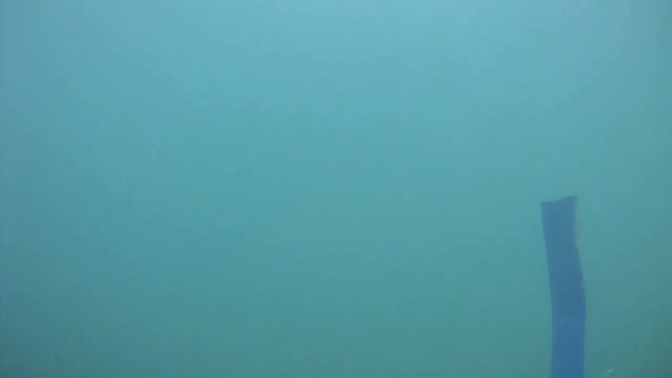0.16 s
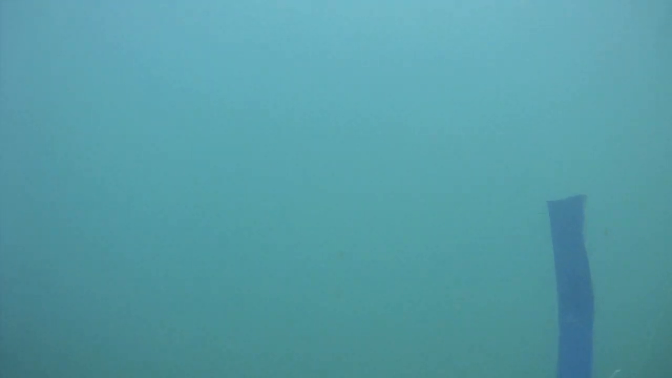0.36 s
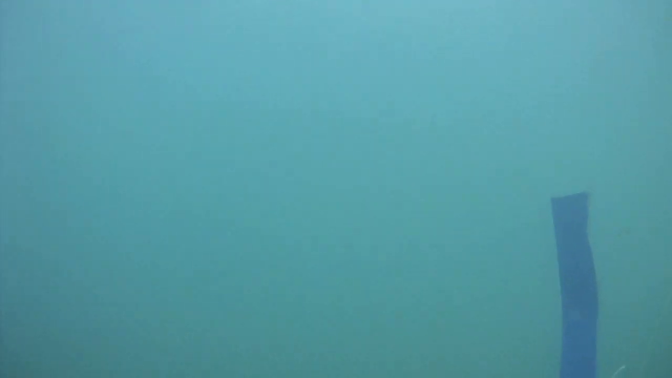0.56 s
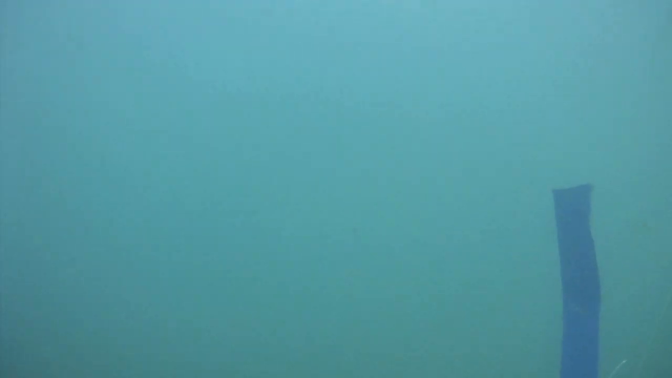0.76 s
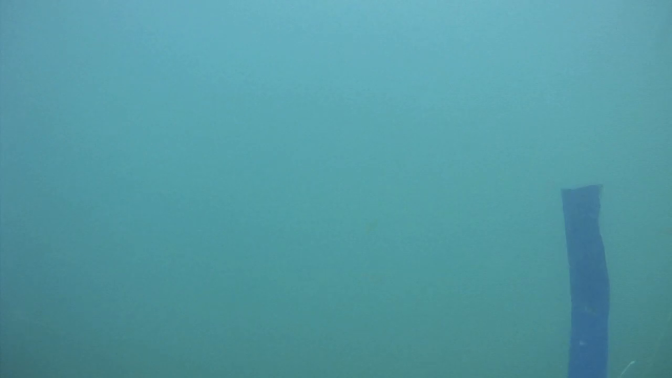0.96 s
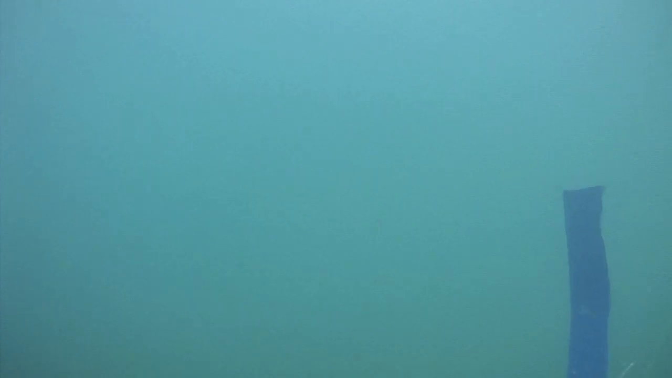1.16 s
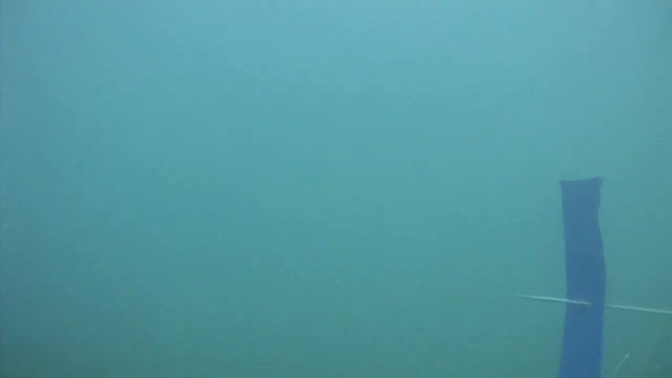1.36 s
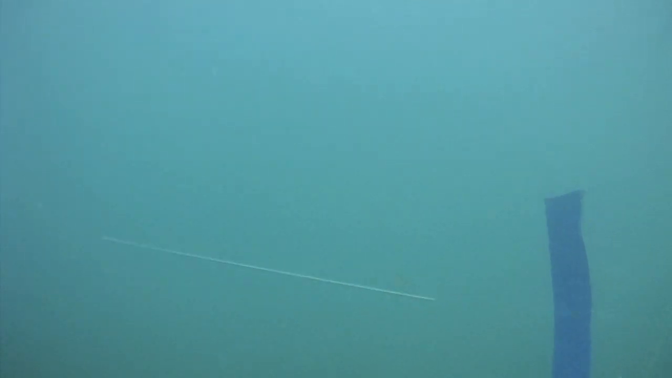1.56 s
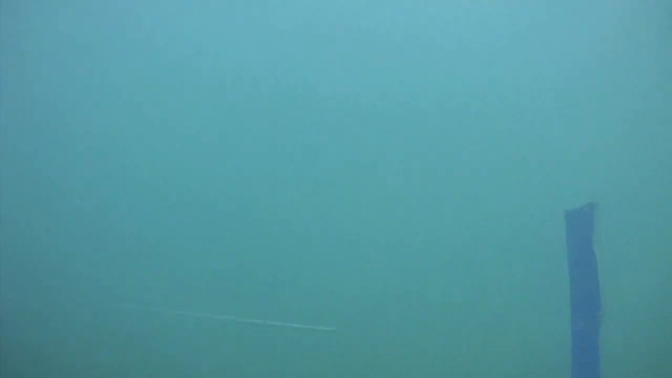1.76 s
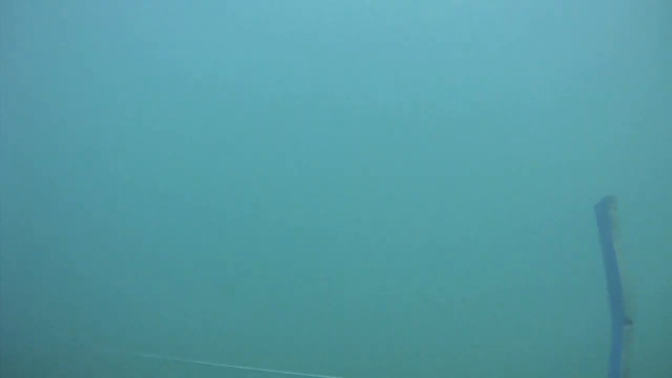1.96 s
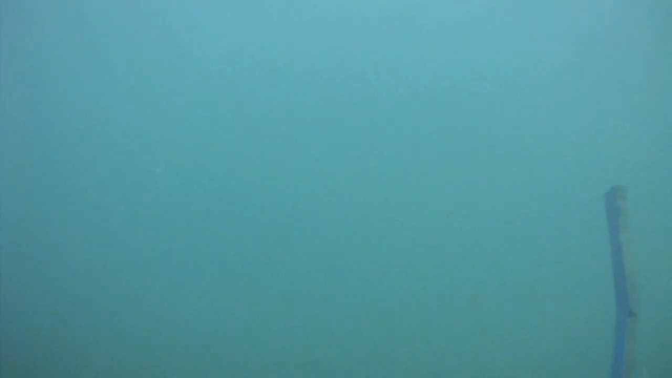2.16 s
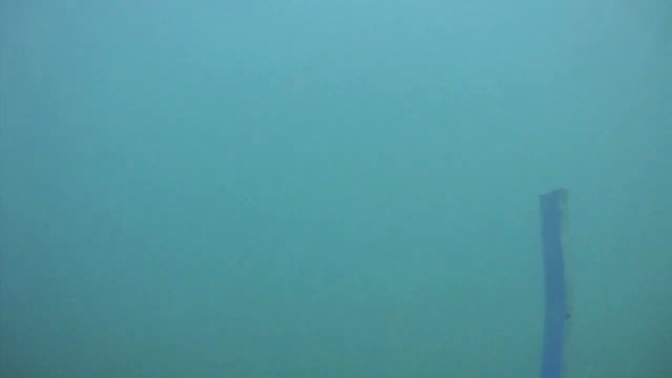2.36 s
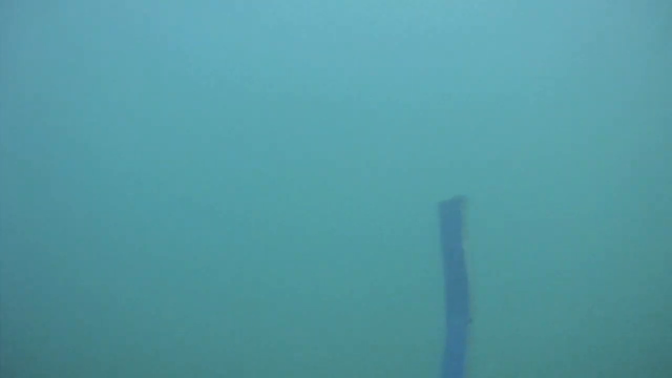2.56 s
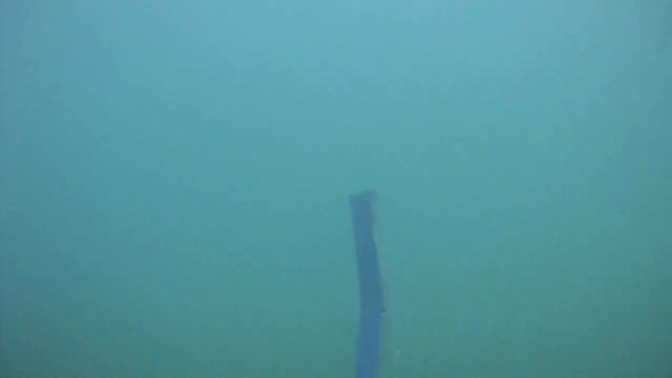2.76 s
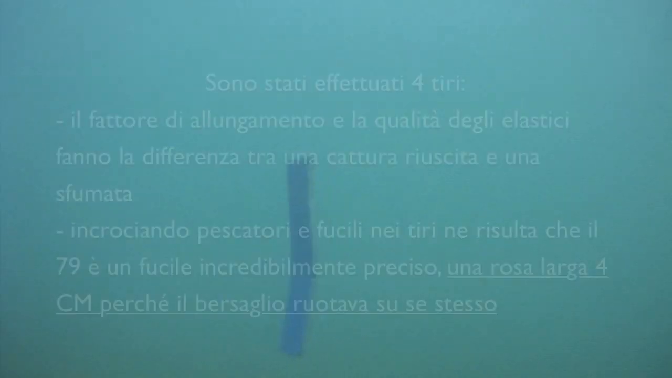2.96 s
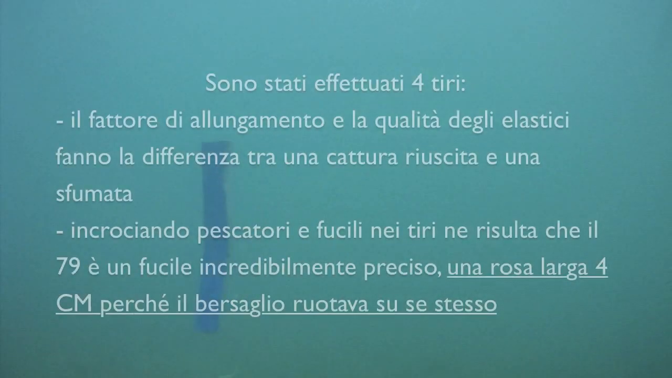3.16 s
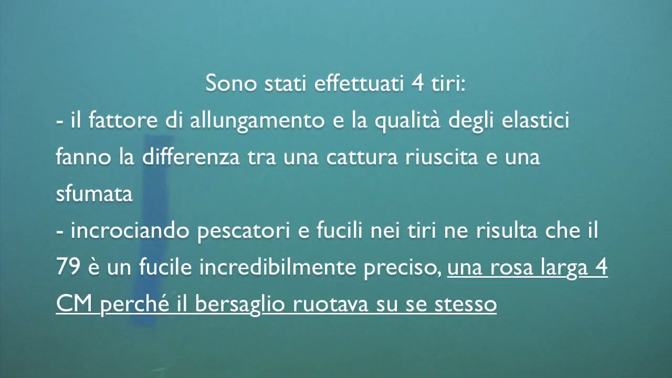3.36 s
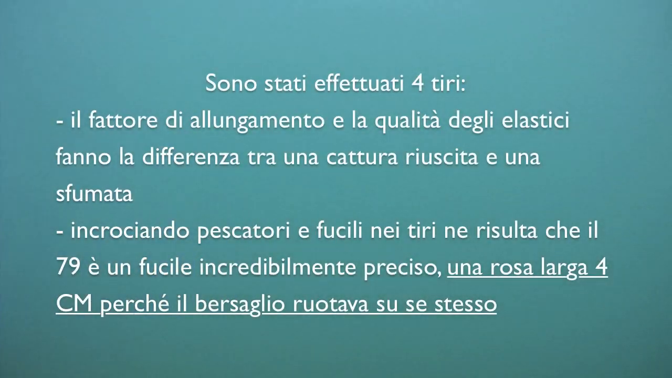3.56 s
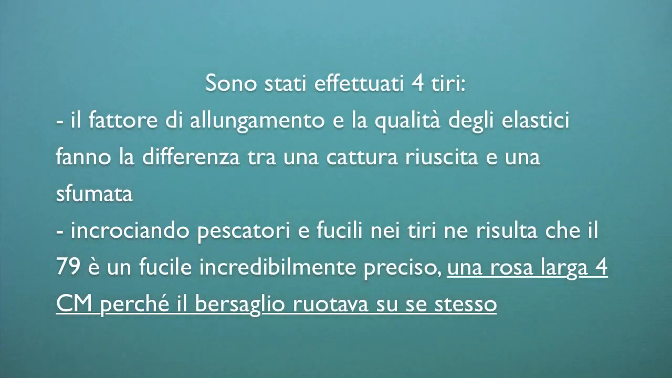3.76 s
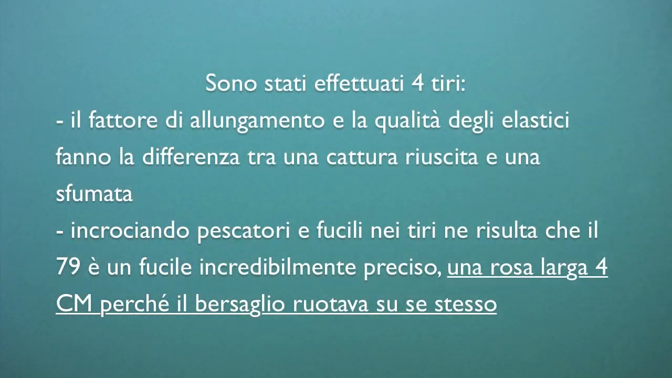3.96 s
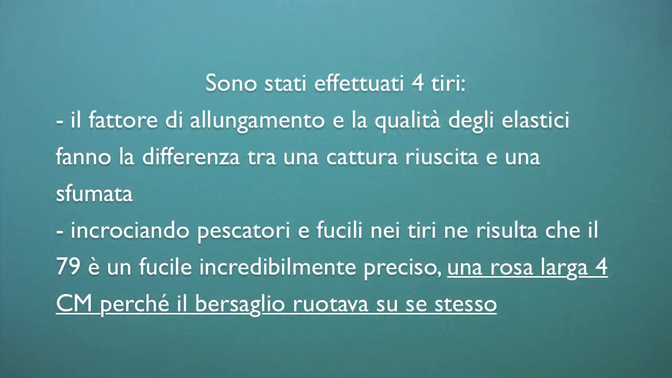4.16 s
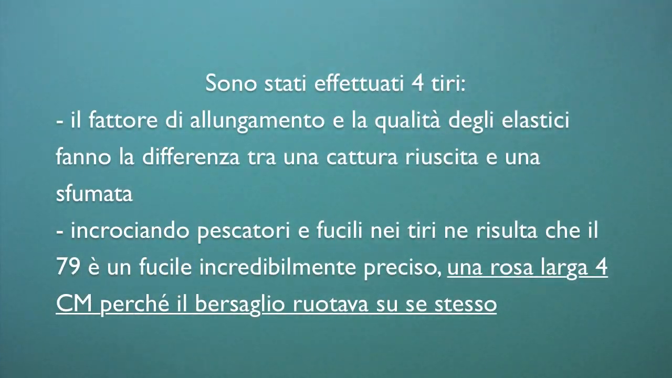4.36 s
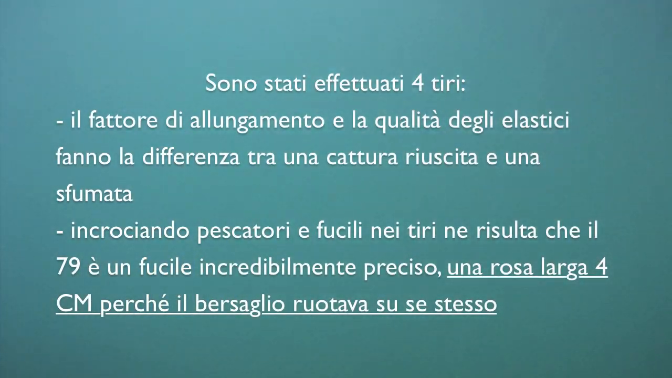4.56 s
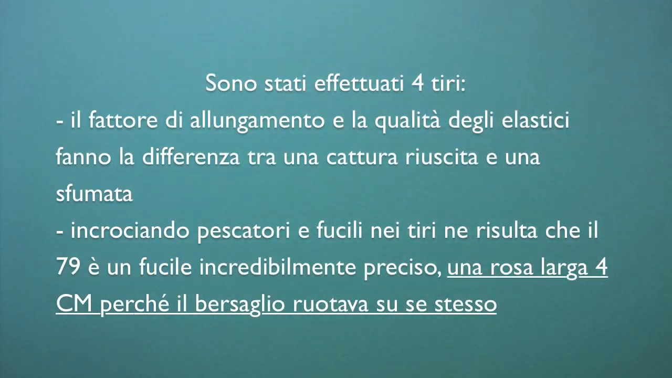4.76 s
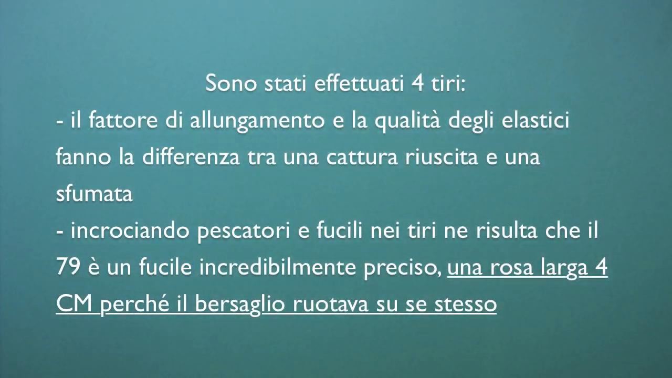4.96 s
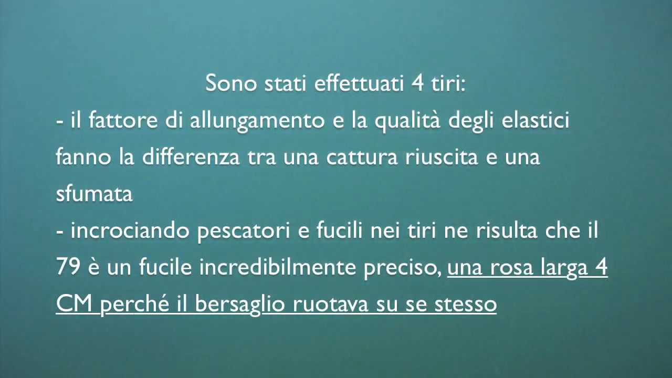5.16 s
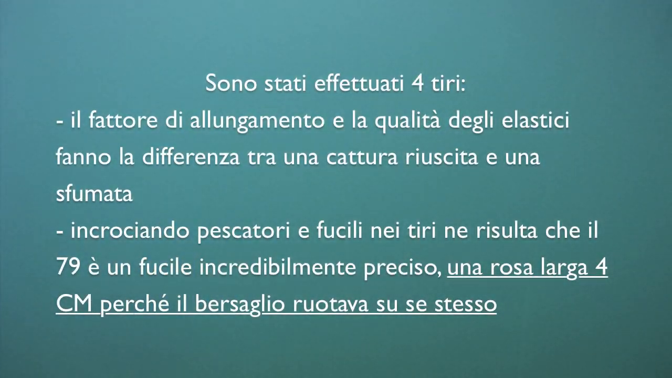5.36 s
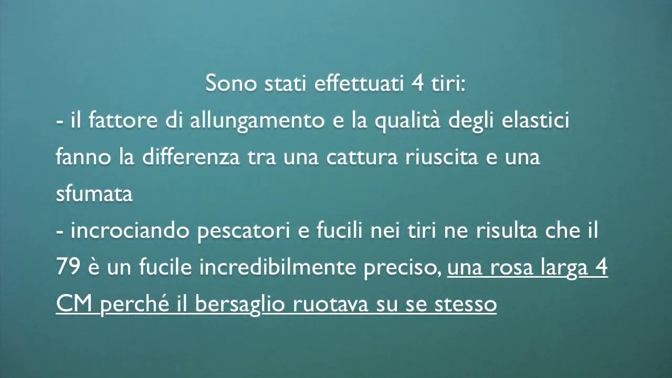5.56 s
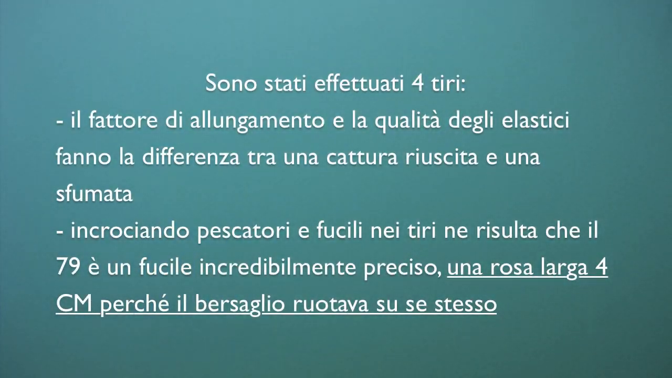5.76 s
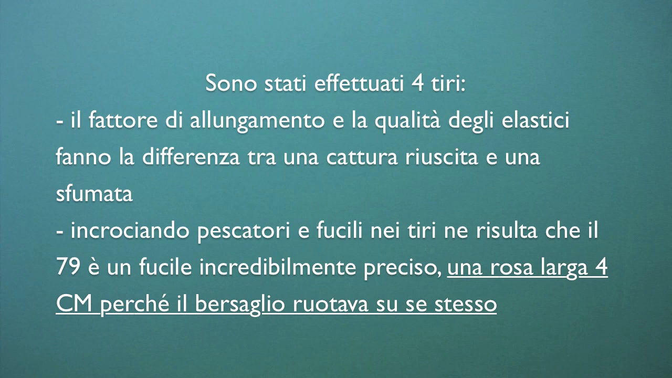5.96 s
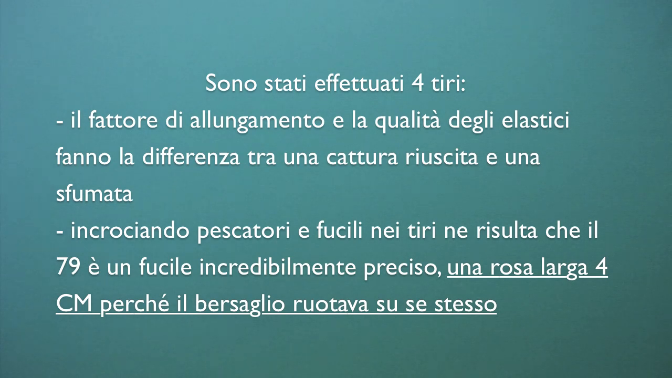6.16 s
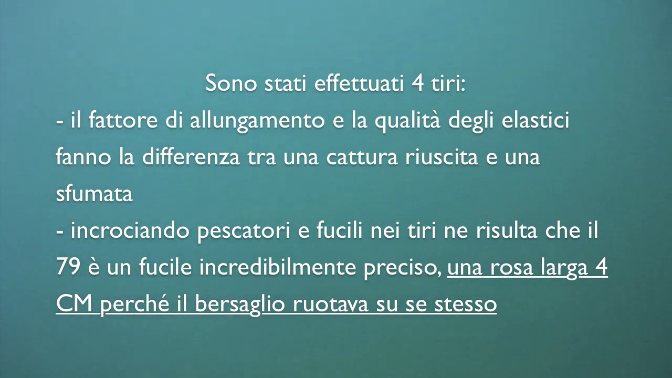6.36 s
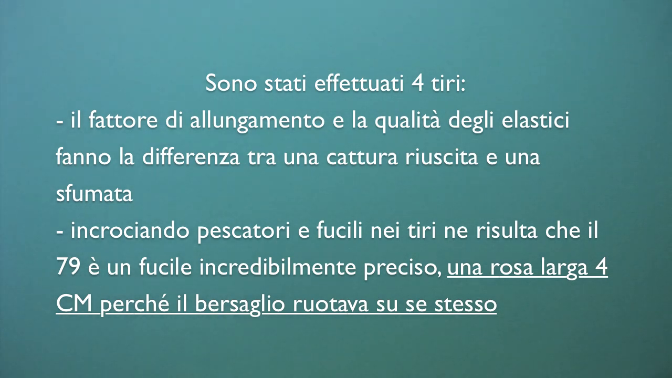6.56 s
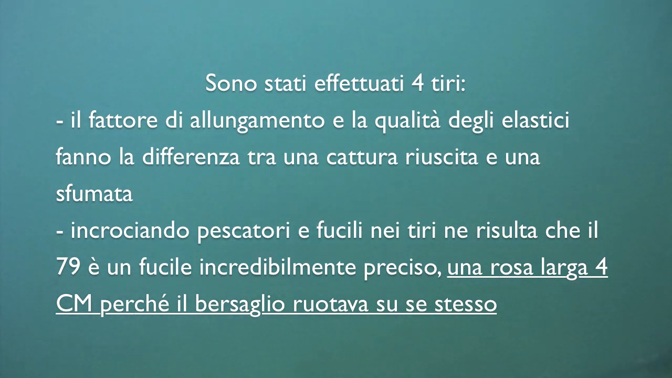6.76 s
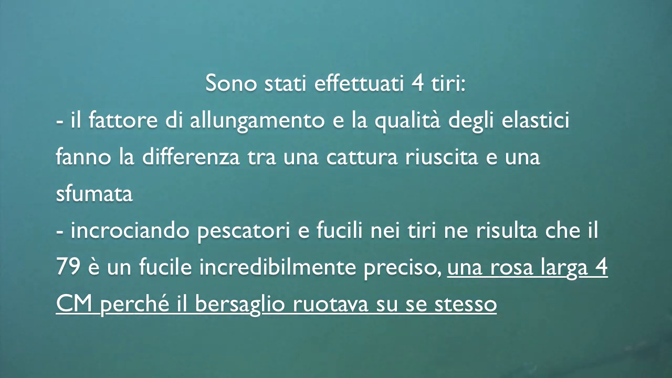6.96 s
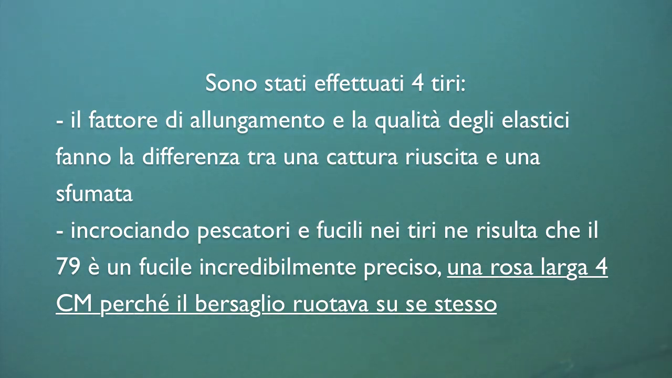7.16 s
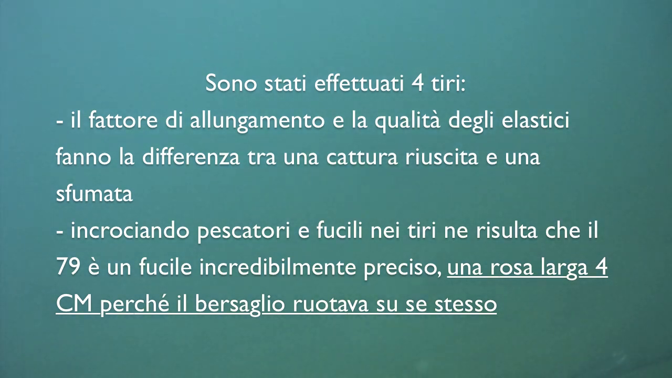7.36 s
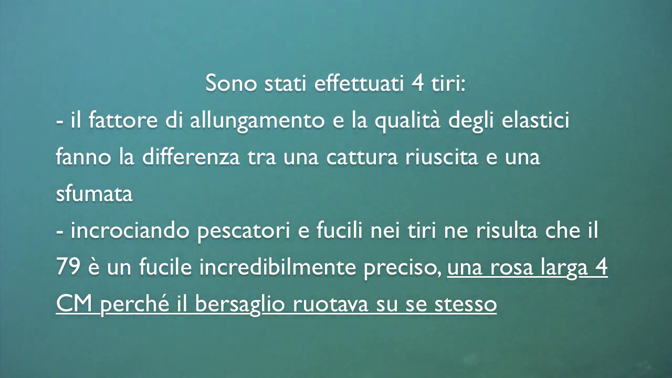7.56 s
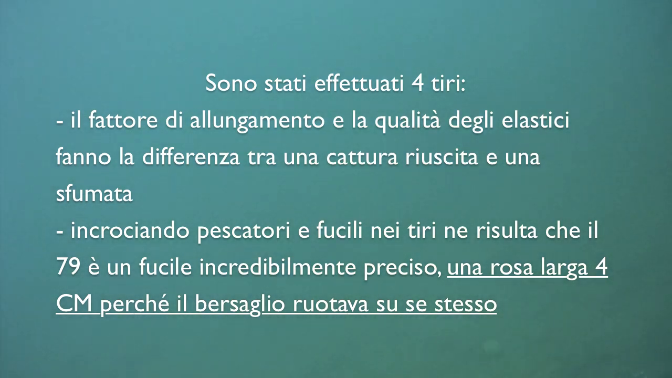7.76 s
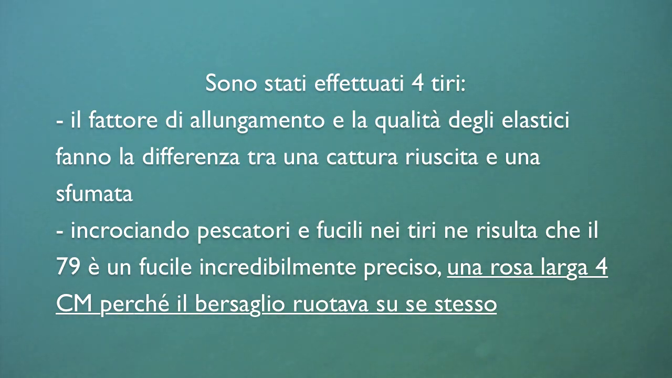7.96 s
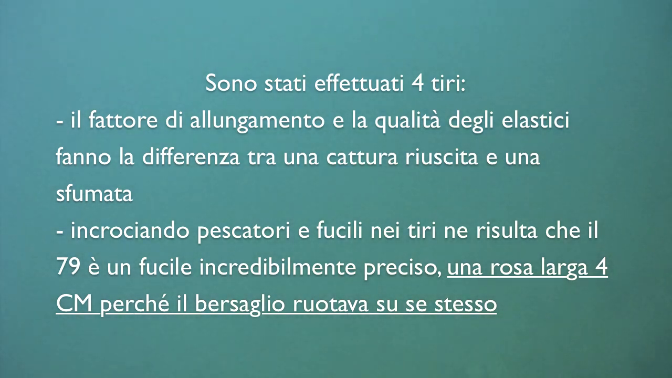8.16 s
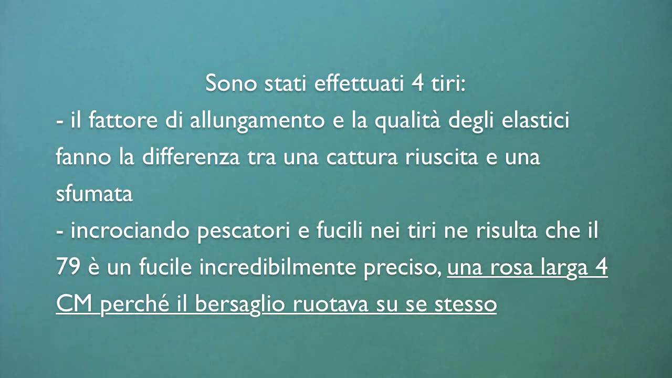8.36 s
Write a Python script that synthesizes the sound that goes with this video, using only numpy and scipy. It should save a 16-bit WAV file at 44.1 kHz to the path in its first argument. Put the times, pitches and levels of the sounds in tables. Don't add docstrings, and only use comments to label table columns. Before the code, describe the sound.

Close underwater microphone inside a camera case, slowed and gritty. Quiet low rumble and faint hiss for a second, then a speargun releases in a loud, dense cluster of hard metallic clacks and rattles. A shorter, lower snap follows as the line goes taut, then a weak rebound and a brief scraping drag. Afterward only rumbling water, tiny ticks, cloth scrapes, dull case knocks and a few bubble blips.

```python
import sys
import numpy as np
from scipy import signal
from scipy.io import wavfile
from scipy.ndimage import uniform_filter1d

SR = 44100
rng = np.random.default_rng(int(sys.argv[2]) if len(sys.argv) > 2 else 0)


def unload_audio(sound):
    columns = np.transpose(np.atleast_2d(sound))
    steps = np.round(np.clip(columns, -1, 1) * 32767)
    wavfile.write(sys.argv[1], SR, steps.astype(np.int16))


def elevation(decibels):
    levels = np.asarray(decibels, float)
    return 10 ** (levels / 20)


N = 374581

# hz, width_hz, level_db
GUN = [(1020, 75, -3), (1350, 120, -0.5), (1950, 500, -2.5), (2605, 300, -7.5), (3000, 93, -1.5),
       (3600, 300, -2.5), (4300, 730, -10.5)]


def evened(x):
    return x / np.sqrt(np.mean(x ** 2) + 1e-20)


def read(points, hz):
    f, value = np.transpose(points)
    return np.interp(np.log(hz + 1), np.log(f + 1), value)


def add(mix, start_s, sound):
    part = mix[round(start_s * SR):][:len(sound)]
    part += sound[:len(part)]


def body(x, modes):
    out = 0
    for k, (hz, width_hz, db) in enumerate(modes):
        r = np.exp(-np.pi * width_hz / SR)
        pole = r * np.exp(2j * np.pi * hz / SR)
        out = out + (-1) ** k * elevation(db) * 2 * signal.lfilter([1 - r], [1, -pole], x).real
    return out


def noise(spectrum, patchy_db, size):
    frames, hz = 4 * N // size + 5, np.fft.rfftfreq(size, 1 / SR)
    a, b, patches = rng.standard_normal((frames, len(hz), 3)).T
    patches = uniform_filter1d(patches, size=9, axis=0)
    patches = evened(uniform_filter1d(patches, size=5, axis=1))
    z = (a + 1j * b) * elevation(read(spectrum, hz)[:, None] + patchy_db * patches)
    return evened(signal.istft(z, nperseg=size, noverlap=3 * size // 4)[1][:N])


def ring(db, hz, rise_s, t60_s, fall=1, slide_hz_per_s=0):
    rise_s, t60_s = max(rise_s, 1e-4), max(t60_s, .003)
    t = np.arange(0, rise_s + t60_s, 1 / SR)
    swell = np.sin(np.pi / 2 * np.minimum(t / rise_s, 1)) ** 2
    decay = elevation(db - 60 * (np.maximum(t - rise_s, 0) / t60_s) ** fall)
    return decay * swell * np.cos(2 * np.pi * (hz + slide_hz_per_s * t / 2) * (t - rise_s))


def bursts(rows):
    out = np.zeros(N)
    for start_s, db, rise_s, t60_s in rows:
        add(out, start_s, ring(db, 0, rise_s, t60_s))
    return out


def lumps(per_s):
    t = np.arange(0, N + 256, 256) / SR
    rates_hz = np.geomspace(per_s / 8, per_s, num=24)
    wave = sum(np.sin(2 * np.pi * (f * t + rng.random())) for f in rates_hz)
    return np.interp(np.arange(N) / SR, t, evened(wave))


def puff(length, t60_s):
    return rng.standard_normal(length) * elevation(-60 * np.arange(length) / SR / t60_s)


def crack(db):
    burst = body(puff(1500, t60_s=0.018), GUN)
    burst = signal.lfilter(*signal.butter(N=4, Wn=4900, fs=SR), burst)
    return elevation(db) * burst / abs(burst).max()


def blows():
    # start_s, peak_db, ring_hz, t60_s
    launch = [(1.131, -25, 190, .03), (1.1382, -16.5, 1880, .008), (1.1396, -6.5, 1880, .008),
              (1.138, -24.5, 2980, .015), (1.141, -28, 3850, .012), (1.155, -32, 3700, .012),
              (1.1425, -17.5, 1200, .025), (1.1495, -19, 940, .013), (1.153, -22.5, 1970, .02),
              (1.161, -20, 780, .015), (1.165, -7, 2004, .012), (1.167, -7, 2004, 0.008),
              (1.1705, -16, 3030, .011), (1.171, -22, 4350, .007), (1.1705, -23, 3700, .007),
              (1.1715, -27, 2600, .008), (1.144, -27, 3600, .01), (1.155, -30, 3000, .012),
              (1.16, -25, 2000, .012), (1.176, -29, 3400, .012), (1.184, -31, 3700, .012),
              (1.193, -31, 3600, .015), (1.1712, -3.5, 1920, .011), (1.172, -14.5, 1400, 0.014),
              (1.17, -34, 215, .05), (1.177, -24, 1800, .014), (1.187, -23, 2045, .02),
              (1.193, -23.5, 1950, 0.017), (1.204, -9.5, 1846, 0.013), (1.2067, -14, 1846, .007),
              (1.205, -30, 2700, .015), (1.1495, -26, 1050, .02), (1.17, -26, 1050, .02),
              (1.229, -40, 3600, .014), (1.208, -32, 3600, .012), (1.178, -24, 1450, .012),
              (1.2135, -23, 2000, .015), (1.215, -28, 1600, .012), (1.218, -21, 1950, .014),
              (1.222, -33, 1750, .012), (1.229, -26, 1950, .014), (1.247, -40, 1900, .013),
              (1.313, -47.5, 2040, .03)]
    # start_s, peak_db, ring_hz, t60_s
    snatch = [(1.3418, -8.5, 684, 0.019), (1.3406, -19, 1020, .03), (1.342, -26.5, 3600, 0.0084),
              (1.3475, -24.5, 797, 0.012), (1.351, -28, 900, .014), (1.339, -29, 500, .01),
              (1.3415, -37, 5000, .006), (1.352, -37, 2100, .015), (1.341, -31, 1600, .014),
              (1.341, -35, 2500, .012), (1.43, -44, 1000, .04), (1.392, -41, 1030, .04),
              (1.343, -37, 190, 0.3), (1.36, -42, 160, .3), (1.35, -28.5, 3660, 0.013),
              (1.367, -43, 3600, .02), (1.394, -51, 3600, .02), (1.404, -55, 3780, .02),
              (1.412, -55, 3750, .02), (1.42, -55, 3680, .02), (1.435, -54, 3600, .025),
              (1.39, -34.5, 504, 0.035), (1.414, -36, 596, 0.03), (1.485, -40, 3820, 0.02),
              (1.486, -44, 1400, .012), (1.487, -46, 2040, .012), (1.487, -41, 480, 0.04),
              (1.496, -43, 600, .04), (1.4975, -34, 3650, .012), (1.4985, -30, 3650, .017),
              (1.499, -37, 2500, .012), (1.4985, -34, 1940, 0.017)]
    # start_s, peak_db, ring_hz
    drag = [(1.590, -50, 1950), (1.594, -49, 1950), (1.6, -40, 763), (1.606, -50, 1950), (1.612, -43, 1950),
            (1.617, -44, 1290), (1.62, -44, 2000), (1.625, -45, 2280), (1.629, -43, 1860),
            (1.631, -48, 720), (1.634, -54, 3200), (1.635, -48, 1150), (1.639, -45, 2200),
            (1.64, -55, 3600), (1.641, -46, 1800), (1.642, -46, 1100), (1.647, -45, 1260),
            (1.649, -49, 1920), (1.651, -45, 1230), (1.652, -50, 850), (1.656, -49, 1080)]
    launch_rise_s, launch_fall, drag_t60_s = 0.0013, 1.2, 0.015
    snatch_rise_s, rise_per_oct, snatch_fall = 0.003124, .75, 0.74
    crack_db, crack_db_per_oct = -19, 5.5

    rows = [row + (launch_rise_s, launch_fall) for row in launch]
    for row in snatch:
        rise_s = snatch_rise_s * min(1, 1000 / row[2]) ** rise_per_oct
        rows.append(row + (rise_s, snatch_fall))
    rows += [row + (drag_t60_s, launch_rise_s, launch_fall) for row in drag]
    out = np.zeros(N)
    for start_s, db, hz, t60_s, rise_s, fall in rows:
        add(out, start_s, ring(db, hz, rise_s, t60_s, fall))
        add(out, start_s + rise_s / 2, crack(db + crack_db + crack_db_per_oct * np.log2(hz / 1000)))
    return out


def wander(x):
    drift_share, drift_s = .035, .012
    drift = uniform_filter1d(rng.standard_normal(len(x)), size=round(drift_s * SR))
    t = np.arange(len(x))
    return np.interp(t + np.cumsum(drift_share * evened(drift)), t, x)


def rattle():
    # hz, width_hz, level_db
    barrel_modes = [(190, 120, 1.5), (560, 260, 3), (980, 300, 0)]
    # hz, width_hz, level_db
    gun_modes = [(1050, 320, -5), (1480, 380, 1), (1980, 560, -4), (2800, 600, -5)]
    # hz, width_hz, level_db
    shaft_modes = [(2650, 450, -8), (3080, 420, 0), (3650, 420, 0), (4350, 600, -7), (5230, 700, -19)]
    wash_db = [-9, -2, -2]
    # start_s, peak_db, rise_s, t60_s
    thuds = [
        (1.138, -35.5, 0.011, 0.2),
        (1.155, -35, 0.0041, 0.049),
        (1.175, -47, 0.0048, 0.061),
        (1.345, -23, 0.0025, 0.025),
        (1.355, -40, 0.0049, 0.37),
        (1.48, -45, 0.022, 0.037),
        (1.51, -70.5, .003, .12),
        (1.59, -52.5, 0.05, .065),
    ]
    # start_s, peak_db, rise_s, t60_s, shaft_vs_gun_db
    shakes = [(1.131, -43.5, .002, 0.1, -5.5), (1.136, -28.5, 0.0034, 0.16, -14.5),
              (1.148, -30, .008, 0.11, -7), (1.162, -20.5, 0.0097, .035, -8), (1.182, -40, .005, 0.22, -1),
              (1.204, -38, .004, 0.095, -5.5), (1.24, -52, 0.0076, 0.69, -3),
              (1.34, -33, 0.0047, 0.048, -9.5), (1.355, -58, 0.0047, 0.45, -4.5),
              (1.375, -50, .003, 0.03, -8), (1.481, -54, .016, .03, -20), (1.584, -51, 0.058, 0.054, -13.5)]
    hits_per_s, spread_db, end = 3600, 2.1, 2 * SR

    hits = (rng.random((3, end)) < hits_per_s / SR) * rng.choice([-1, 1], (3, end))
    hits = hits * elevation(spread_db * np.minimum(rng.exponential(1, (3, end)), 4))
    barrel = bursts(thuds)
    gun = bursts(row[:4] for row in shakes)
    shaft = bursts((start_s, db + up_db, rise_s, t60_s) for start_s, db, rise_s, t60_s, up_db in shakes)
    parts = [(barrel, barrel_modes), (gun, gun_modes), (shaft, shaft_modes)]
    out = np.zeros(N)
    for k, (level, modes) in enumerate(parts):
        wash = body(hits[k], modes)
        ringing = evened(body(wash, modes)) + elevation(wash_db[k]) * evened(wash)
        add(out, 0, level[:end] * wander(ringing))
    return out


def jolt():
    # time_s, offset
    offsets = [
        (1.166, 0),
        (1.17, -0.019),
        (1.177, 0.00025),
        (1.182, 0.0089),
        (1.205, 0.0052),
        (1.228, .0055),
        (1.236, .001),
        (1.25, 0),
    ]
    steps_per_s, step_share = 190, .45
    uneven = evened(uniform_filter1d(rng.standard_normal(N), size=400))
    turns = np.cumsum(steps_per_s * (1 + .3 * uneven)) / SR
    saw = 1 + step_share * (1 - 2 * (turns % 1))
    offset = np.interp(np.arange(N) / SR, *np.transpose(offsets)) * saw
    return signal.lfilter(*signal.butter(N=4, Wn=750, fs=SR), offset)


def ticks():
    # start_s, peak_db, ring_hz
    gear_ticks = [(2.605, -53.5, 2020), (2.715, -53.5, 1800), (2.903, -57, 870), (3.574, -46, 609),
                  (4.178, -55.5, 1230), (4.258, -57.5, 1900), (4.343, -60, 1485), (4.394, -56, 2060),
                  (4.737, -52.5, 1450), (4.952, -63, 597), (5.795, -42, 1450), (5.837, -51, 1475),
                  (5.938, -57, 1996), (6.07, -51.5, 2255), (6.363, -49.5, 2054), (6.439, -47.5, 1028),
                  (6.55, -53.5, 2310), (6.662, -54.5, 2220), (6.792, -53, 1057), (7.41, -52, 962),
                  (7.488, -51, 2240), (7.51, -47, 990), (7.572, -52.5, 650), (7.672, -50, 960),
                  (7.89, -54, 1206), (7.908, -49, 1046), (8.152, -51.5, 1304), (8.205, -48.5, 603),
                  (8.332, -40, 1900), (8.41, -53.5, 1895),
                  (4.952, -55, 2300), (4.343, -57, 4700), (4.178, -59, 2200), (4.143, -60, 2050),
                   (3.272, -59, 3500), (3.255, -54, 330), (3.6, -60, 3400), (2.606, -57, 2950),
                   (2.607, -58, 2500), (7.575, -60, 520), (7.61, -62, 560), (4.297, -61, 2150),
                   (4.345, -63, 2300), (4.415, -59, 2400), (4.702, -58, 3555), (4.563, -61.5, 3950),
                   (5.837, -53, 1950), (5.885, -60, 3570), (5.918, -64, 3000), (5.985, -63, 3650),
                   (6.033, -58, 2090), (6.071, -59, 4660), (6.175, -63, 2200), (6.243, -60.5, 3550),
                   (7.511, -51, 1800), (7.488, -56, 1450), (7.489, -59, 3700), (7.511, -55, 1480),
                   (7.511, -58, 3500), (7.445, -60, 2950), (7.357, -61, 3650), (7.571, -58, 1150),
                   (2.761, -58, 1700), (7.347, -59, 2200), (7.59, -56, 600), (2.9, -59, 2010),
                   (2.914, -57, 1000), (2.216, -62.5, 784), (2.606, -54, 960), (2.685, -58, 800),
                   (2.759, -60, 2115), (3.272, -56, 1296), (3.575, -49, 1034), (3.707, -57, 646),
                   (4.052, -56.5, 1917), (4.143, -57, 1416), (4.295, -56, 1560), (4.325, -55, 1500),
                   (4.368, -58, 2010), (4.792, -63, 952), (5.181, -58, 786), (5.635, -56.5, 1223),
                   (5.915, -58, 2100), (5.98, -58, 2207), (6.487, -55, 1410), (6.736, -54, 756),
                   (6.752, -57, 2047), (7.005, -57, 1789), (8.219, -54, 972), (8.36, -58, 600),
                   (8.466, -55.5, 1930)]
    t60_s = 0.023
    out = np.zeros(N)
    for start_s, db, hz in gear_ticks:
        add(out, start_s, ring(db + 2, hz, 0.00051, t60_s))
        add(out, start_s, ring(db - 8.0, hz * 1.57, 0.00028, t60_s / 2))
    return out


def clicks():
    # start_s, peak_db, strongest_hz
    rows = [(2.6064, -42.5, 3450), (2.6766, -56, 3600), (2.687, -51, 3670), (2.7135, -45, 3480),
            (2.8203, -55.5, 2870), (3.1655, -53, 3630), (3.5746, -51.5, 3600), (3.6888, -53, 3630),
            (3.7083, -52, 3590), (3.836, -51, 3770), (4.1428, -54.5, 3250), (4.2575, -53, 3120),
            (4.3421, -42, 3430), (4.9524, -44.5, 3410), (5.6344, -51.5, 4690), (5.9118, -53.5, 3620),
            (6.0704, -53, 3420), (6.4964, -51, 3044), (6.698, -55, 3020), (6.7935, -50.5, 3460),
            (7.2432, -55, 3320), (7.2772, -53, 3530), (7.3844, -54.5, 2940), (7.5974, -55, 3460),
            (7.8893, -55, 3536), (7.9985, -53.5, 3910), (8.1507, -52, 3100), (8.3328, -50, 2680),
            (8.3602, -52, 2710), (8.4166, -53.5, 3640)]
    edge, t60_s = 3.5, 0.017
    crisp = signal.butter(N=3, Wn=[1100, 4600], btype="band", fs=SR)
    out = np.zeros(N)
    for start_s, db, hz in rows:
        burst = signal.lfilter(*crisp, np.append(edge, puff(500, t60_s)))
        add(out, start_s, elevation(db + .6) * burst / abs(burst).max())
        add(out, start_s, ring(db - 4, hz, 0.0007, t60_s))
    return out


def pings():
    # start_s, peak_db, main_hz, second_hz, t60_s
    rows = [(2.606, -57, 2125, 3490, 0.19), (2.62, -65, 2120, 2128, .4), (2.66, -67, 2125, 2060, .2),
            (2.713, -58, 3520, 2120, .17), (2.822, -61, 3570, 2870, .1), (2.85, -70, 3550, 3620, .2),
            (2.76, -63, 2080, 2030, .12), (4.669, -50.5, 1160, 1337, 0.072), (5.798, -54, 1330, 1250, .06),
            (4.969, -57, 566, 623, 0.08), (7.717, -59, 1723, 1740, .057), (7.998, -63, 1510, 1610, .076),
            (4.985, -62, 1200, 1150, .06), (8.334, -44, 2790, 1750, .031)]
    out = np.zeros(N)
    for start_s, db, main_hz, second_hz, t60_s in rows:
        add(out, start_s, ring(db, main_hz, 2.21 / main_hz, t60_s))
        add(out, start_s, ring(db - 1, second_hz, 2.33 / main_hz, t60_s))
    return out


def bubbles():
    # start_s, peak_db, pitch_hz, slide_hz_per_s, t60_s
    rows = [
        (7.1589, -38, 528, -330, .14),
        (7.1589, -39, 612, 380, .15),
        (7.277, -56, 500, 0, .05),
        (7.277, -55, 690, 0, .05),
        (7.281, -53, 495, 300, .11),
        (7.281, -52, 680, -150, .15),
        (8.045, -55, 640, 500, .25),
        (8.05, -60, 690, 300, .2),
        (7.228, -61, 940, 0, .05),
        (7.357, -61, 550, 0, .05),
    ]
    out = np.zeros(N)
    for start_s, db, hz, slide_hz_per_s, t60_s in rows:
        add(out, start_s, ring(db, hz, .0043, t60_s, 1.2, slide_hz_per_s))
    return out


def snaps():
    # start_s, peak_db, pull_s, recoil_s
    slips = [
        (3.576, -47, 0.00077, .0045),
        (3.8015, -37.5, 0.0017, 0.0062),
        (3.8367, -34.5, 0.0017, 0.0078),
    ]
    # hz, level_db, t60_s
    case_rings = [(620, -10, .03), (1000, -16, .028), (1650, -22, .012)]
    dull = signal.butter(N=2, Wn=550, fs=SR)
    t = np.arange(-441, 1323) / SR
    out = np.zeros(N)
    for start_s, db, pull_s, recoil_s in slips:
        pull = -.6 * np.exp(np.minimum(t, 0) / pull_s)
        recoil = (1.1 - 0.9 * t / recoil_s) * np.exp(-(t / recoil_s) ** 2)
        step = np.where(t < 0, pull, recoil)
        add(out, start_s + t[0], elevation(db) * signal.lfilter(*dull, step))
        for hz, below_db, t60_s in case_rings:
            add(out, start_s, ring(db + below_db, hz, .0006, t60_s))
    return out


def housing():
    # start_s, peak_db, pitch_hz
    knocks = [(1.799, -56, 104.8), (1.941, -51.5, 92), (2.448, -53, 75.4), (3.001, -57.5, 103.5),
              (3.141, -52, 110), (3.361, -39, 91.3), (3.45, -53, 75.4), (3.553, -44, 62.5),
              (4.473, -48, 118), (5.062, -55.5, 75.8), (5.218, -45, 104.5), (5.719, -57.5, 131),
              (7.415, -53, 116), (8.321, -47.5, 163.2), (8.465, -40.5, 123)]
    # start_s, peak_db
    judder = [
        (3.936, -49.5),
        (3.991, -51.5),
        (4.066, -51.5),
        (4.141, -49),
        (4.203, -53),
        (4.268, -54),
        (4.334, -53.5),
    ]
    judder_hz, judder_upper_db, knock_upper_db = 114, 2.5, -28
    rise_s, t60_s, upper_ratio = 0.0131, 0.11, 1.55
    rows = [row + (knock_upper_db,) for row in knocks]
    rows += [row + (judder_hz, judder_upper_db) for row in judder]
    out = np.zeros(N)
    for start_s, db, hz, upper_db in rows:
        add(out, start_s, ring(db + 5, hz, rise_s, t60_s))
        add(out, start_s, ring(db + upper_db, hz * upper_ratio, rise_s, t60_s))
    return out


def rustle():
    # hz, width_hz, level_db
    scrape_modes = [(1450, 300, -4), (2100, 420, 1.5), (2900, 400, -8), (3600, 280, -2)]
    # start_s, length_s, level_db
    brushes = [(2.595, 0.29, -71), (3.239, 0.081, -64), (3.682, 0.088, -66.5), (4.042, 0.26, -70),
               (4.276, 0.047, -68), (4.309, .08, -70), (4.72, 0.039, -70.5), (5.09, .035, -72),
               (5.9, 0.048, -65), (5.958, 0.047, -66), (6.021, 0.077, -67), (7.562, 0.062, -70),
               (6.727, 0.049, -67), (7.478, 0.056, -60.5), (7.664, 0.083, -76.5), (8.143, 0.16, -69.5),
               (8.331, 0.15, -85.5)]
    grains = (rng.random(N) < 1600 / SR) * rng.choice([-1, 1], N)
    grains = grains * elevation(3.8 * np.minimum(rng.exponential(1, N), 4))
    level = np.zeros(N)
    for start_s, length_s, db in brushes:
        add(level, start_s, elevation(db) * np.hanning(round(length_s * SR)))
    return level * evened(body(grains, scrape_modes))


def water():
    # time_s, level_db
    flow = [(0, -63.5), (.1, -62), (.5, -64), (1.1, -63), (1.3, -60), (1.651, -64.5), (2.2, -63),
            (2.45, -55.5), (2.65, -54), (3.1, -58.5), (3.6, -54), (4.7, -58), (4.95, -60.5), (5.6, -60.5),
            (5.75, -56.5), (6.3, -58), (8.05, -58.5), (8.49, -52.5)]
    # start_s, peak_db, rise_s, t60_s
    surges = [
        (1.125, -37.5, 0.039, 0.15),
        (1.338, -54, 0.0068, .6),
        (1.48, -55, 0.035, 0.33),
        (3.18, -64, 0.068, 0.46),
        (5.8, -63, 0.057, 0.49),
        (7.05, -65, 0.096, 1.07),
        (8.3, -54.5, 0.13, .5),
    ]
    # hz, db_per_hz
    deep_spectrum = [(8, -28), (20, -0.5), (42, 1.5), (62, -17.5), (120, -48.5)]
    # hz, db_per_hz
    low_spectrum = [(30, -29.5), (60, 4.5), (130, 2), (210, -9.5), (400, -37.5)]
    # hz, db_per_hz
    hiss_spectrum = [(35, -31.5), (60, -4), (200, -2.5), (926, -10), (4630, -18.5), (6200, -23),
                     (8060, -58.5), (13600, -120)]
    low_db, low_follows, lumps_db, hiss_db, crackle_db = -3, 0.81, 2, -63.5, -80.5

    flow_db = np.interp(np.arange(N) / SR, *np.transpose(flow))
    deep_gain = elevation(flow_db + lumps_db * lumps(per_s=2.0))
    deep = deep_gain * noise(deep_spectrum, patchy_db=0.0, size=8192)
    mean_db = flow_db.mean()
    low_flow_db = low_db + mean_db + low_follows * (flow_db - mean_db)
    stir = elevation(low_flow_db + lumps_db * lumps(per_s=8.6))
    low = (stir + bursts(surges)) * noise(low_spectrum, patchy_db=1.0, size=2048)
    hiss = elevation(hiss_db) * noise(hiss_spectrum, patchy_db=1.0, size=512)
    far = (rng.random(N) < 40 / SR) * elevation(1.9 * np.minimum(rng.exponential(1, N), 4))
    return deep + low + hiss + elevation(crackle_db) * evened(body(far, GUN))


def circuit():
    # hz, db_per_hz
    spectrum = [(60, -27.5), (200, -4), (1000, -3), (4800, -2.5), (5600, -5), (6000, -17)]
    return elevation(-78.5) * noise(spectrum, patchy_db=.5, size=512)


def scene():
    shot = blows() + rattle()
    gear = ticks() + clicks() + pings() + bubbles() + snaps()
    apart = jolt() + circuit()
    return shot + gear + housing() + rustle() + water() + np.array([apart, -apart])


def grit(x):
    # low_hz, high_hz
    gap_hz = [4600, 7400]
    level_db, hold_s = -44, .03
    loud = signal.lfilter(*signal.butter(N=2, Wn=500, btype="high", fs=SR), x)
    window = np.hanning(round(hold_s * SR)) * 2 / (hold_s * SR)
    loudness = np.sqrt(abs(signal.lfilter(window, [1], loud ** 2)))
    band = signal.butter(N=3, Wn=gap_hz, btype="band", fs=SR)
    return elevation(level_db) * loudness * evened(signal.lfilter(*band, rng.standard_normal(len(x))))


def low_pass(x):
    return signal.sosfilt(signal.butter(12, 16480, fs=SR, output="sos"), x)


def record(dry):
    slow_rate_hz, hold = 12000, 4
    edge = signal.firwin(121, 5850, fs=SR)
    slow = signal.oaconvolve(dry, edge[None], "same")
    slow = signal.resample_poly(slow, slow_rate_hz, SR, axis=1, window=("kaiser", 2.5))
    held = signal.resample_poly(np.repeat(slow, hold, axis=1), SR, hold * slow_rate_hz, axis=1)
    held = held + grit(held[0])
    top = signal.firwin(301, 15500, fs=SR)
    return low_pass(signal.oaconvolve(held[:, :N], top[None], "same"))


dry = scene()
out = record(dry)
unload_audio(out)
```